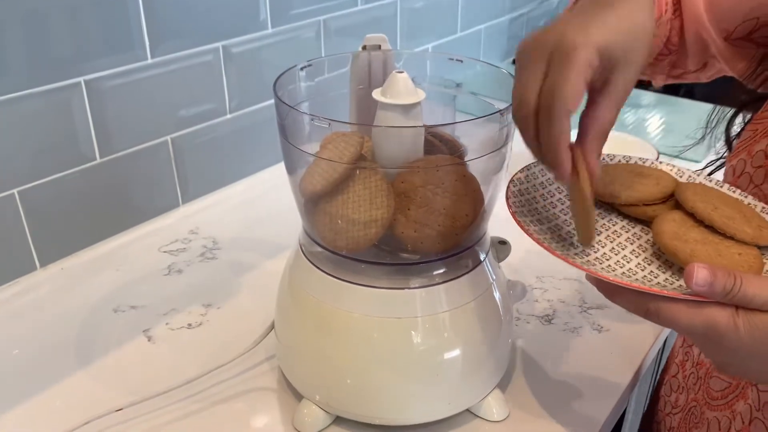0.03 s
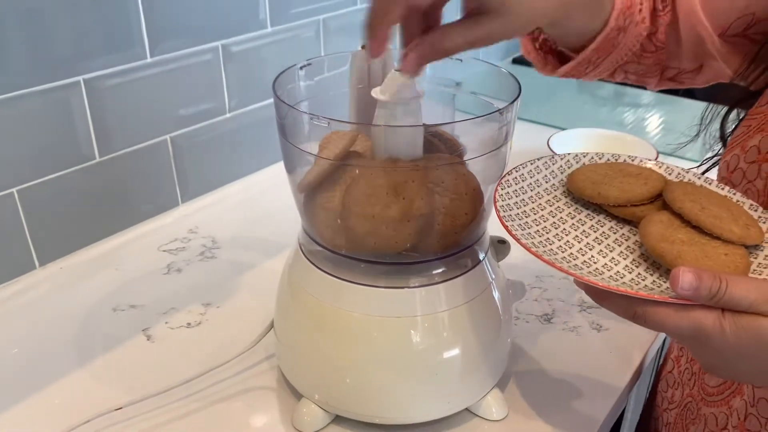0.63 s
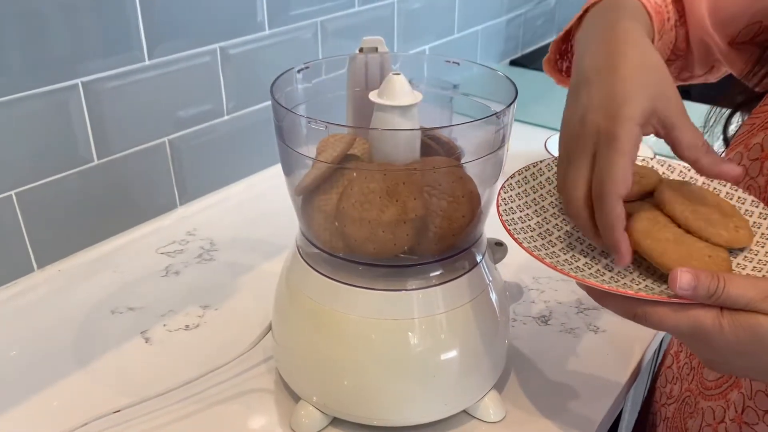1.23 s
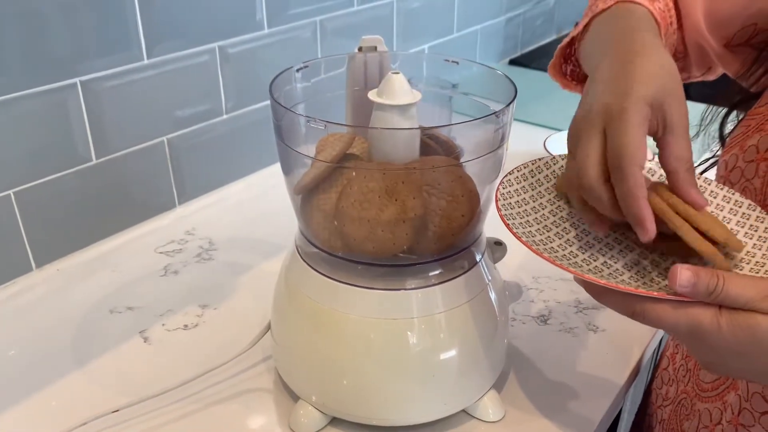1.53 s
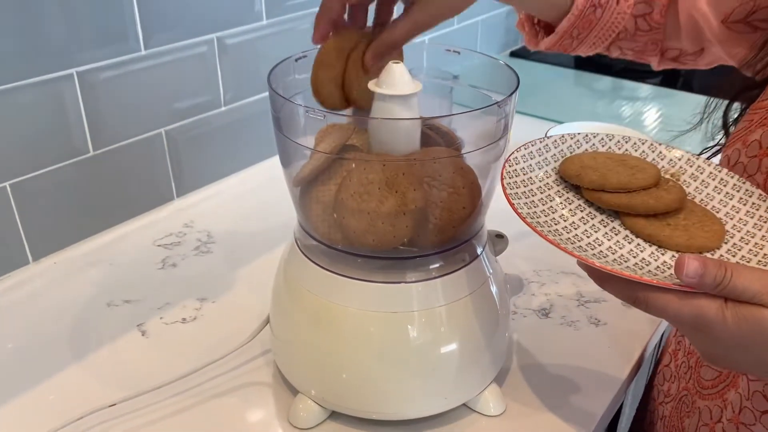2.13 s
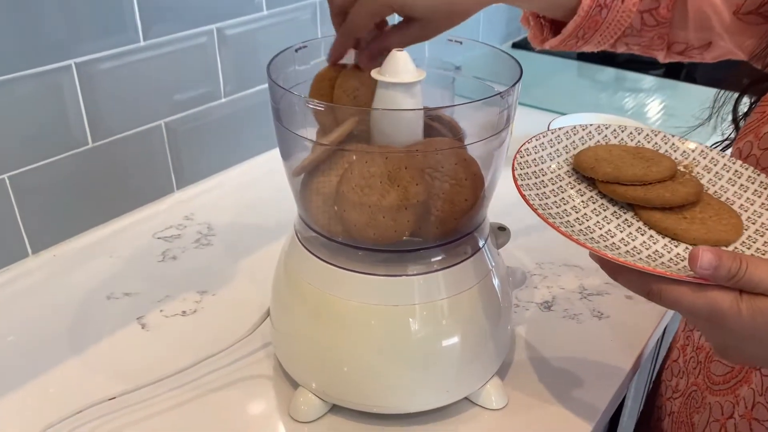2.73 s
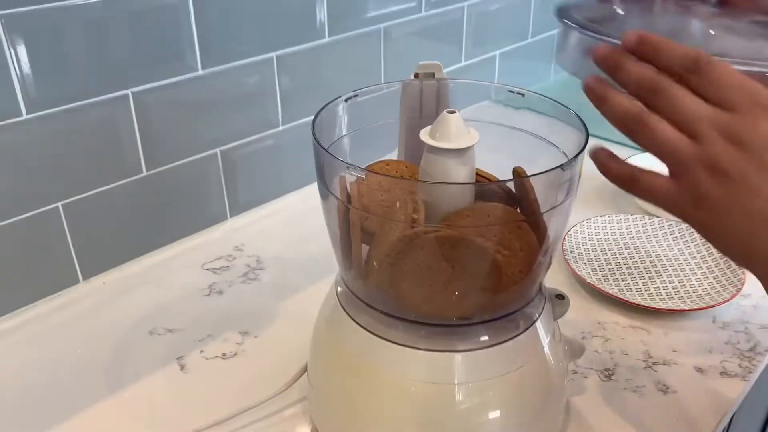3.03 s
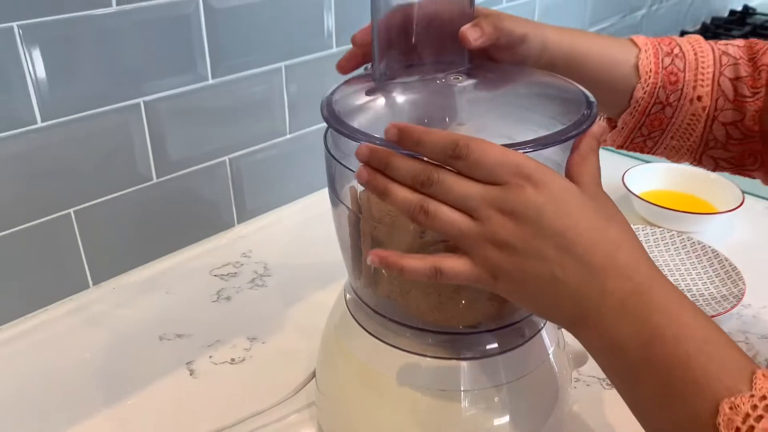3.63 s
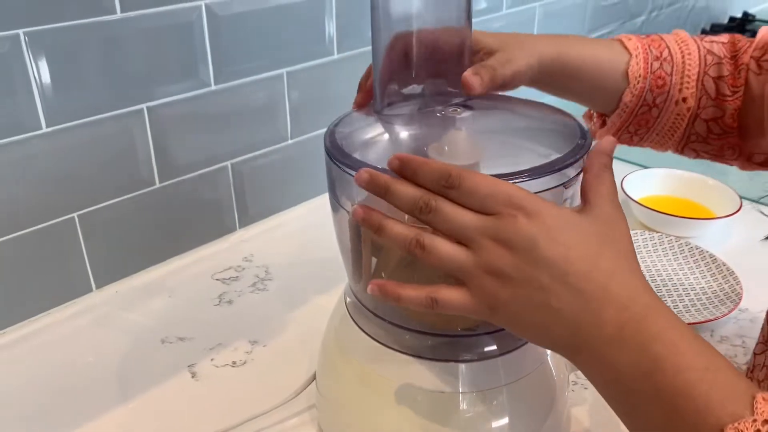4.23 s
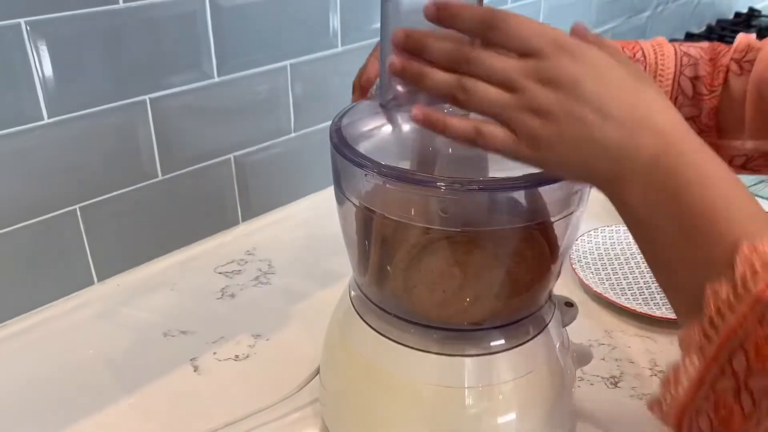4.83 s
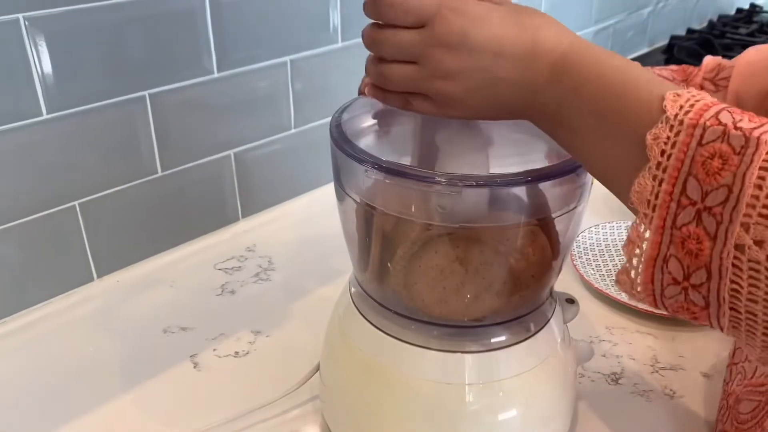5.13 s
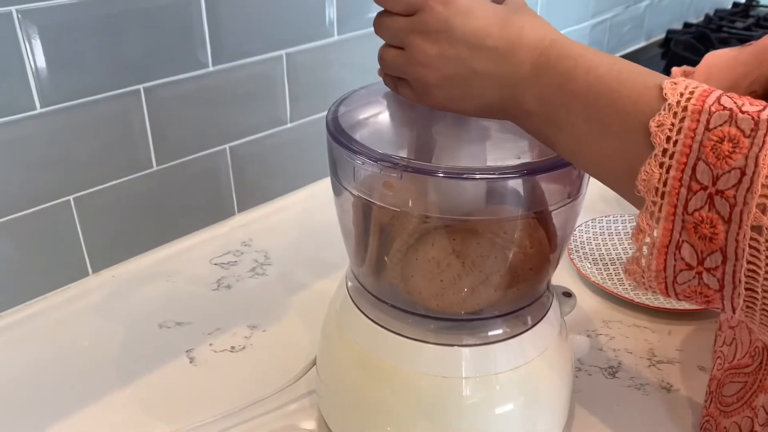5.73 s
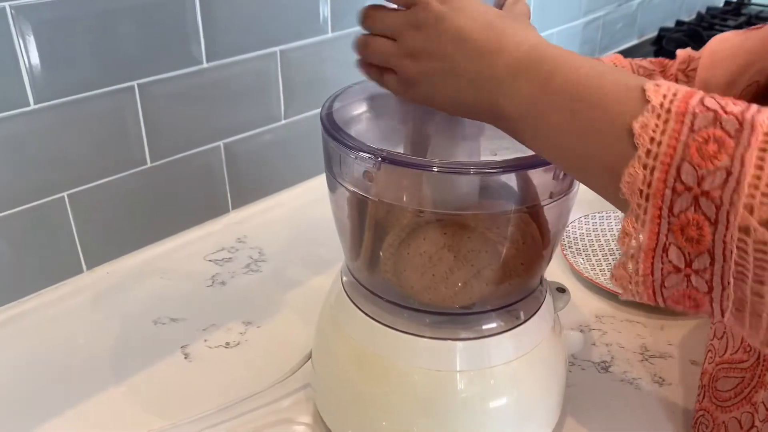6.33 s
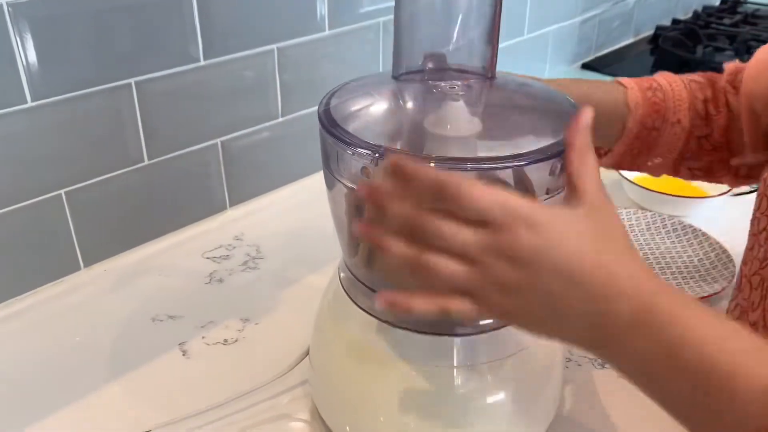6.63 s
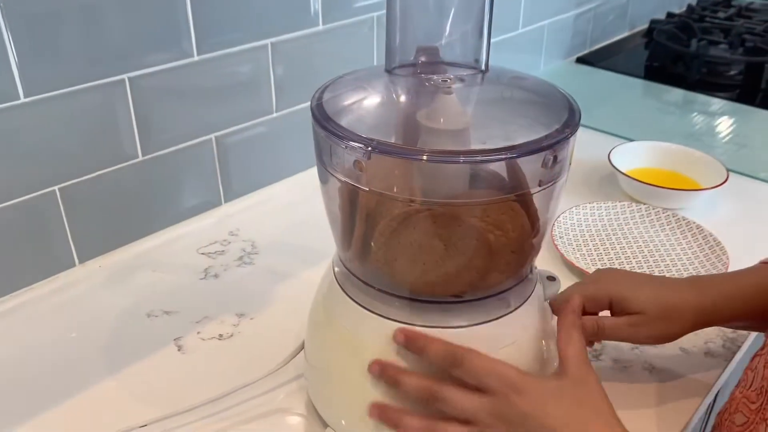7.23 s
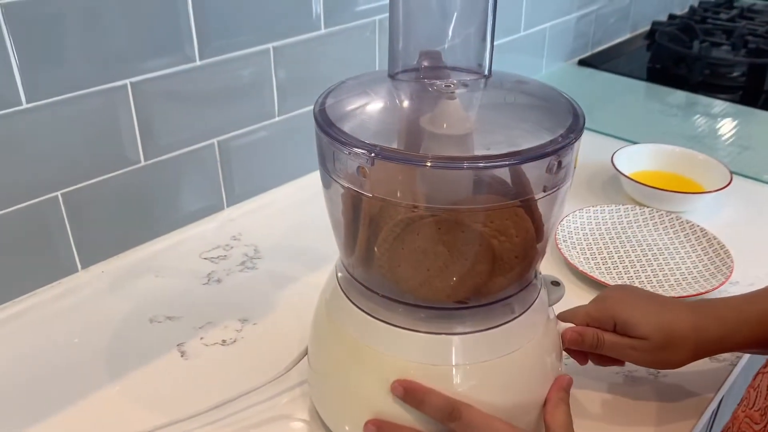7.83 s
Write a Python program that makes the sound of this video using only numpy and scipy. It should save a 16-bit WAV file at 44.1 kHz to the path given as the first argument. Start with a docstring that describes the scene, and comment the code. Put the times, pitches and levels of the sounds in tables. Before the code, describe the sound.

In a tiled kitchen, a biscuit drops into a plastic food processor bowl. More biscuits scrape and clink on a china plate, then settle in the bowl with dry little taps. After an instant of near silence, the plastic lid taps the rim, squeaks briefly and snaps down loudly, then rubs and knocks as it locks. Hands softly bump the machine. The stereo microphone is close, with dull room tone behind.

```python
"""A tiled kitchen, stereo microphone close to a food processor on the worktop, dull room tone behind.
Biscuits scrape on a china plate; one drops into the plastic bowl, more clink off the plate and settle in.
After an instant of near silence the lid rubs and taps on the rim, squeaks, snaps down and is twisted
and knocked until it locks. Last, hands bump the machine, which rumbles on its feet.
Each blow is a short crush of grainy contact that leaves the struck thing ringing into the room."""
import sys
import numpy as np
from scipy import signal
from scipy.fft import rfft, irfft, next_fast_len
from scipy.io import wavfile
from scipy.ndimage import uniform_filter1d

SR = 44100
rng = np.random.default_rng(int(sys.argv[2]) if len(sys.argv) > 2 else 0)


def master_out(mix):
    """Clip the mix to full scale and print it as 16-bit PCM to the path in sys.argv[1]."""
    frames = np.transpose(np.atleast_2d(mix))
    ceiling = np.clip(frames, -1, 1)
    pcm = np.round(ceiling * 32767).astype(np.int16)
    wavfile.write(sys.argv[1], SR, pcm)


N = 356328
TIME = np.arange(N) / SR


def from_db(db):
    return 10 ** (np.asarray(db) / 20)


def rms(x):
    """Level of the middle of a stereo sound."""
    return np.sqrt(np.mean(x.mean(axis=0) ** 2) + 1e-20)


def at_hz(points, hz):
    """Read a table on a log-frequency axis."""
    points = np.array(points)
    return np.interp(np.log(np.maximum(hz, 1)), np.log(points[:, 0]), points[:, 1])


def between(rows, start, end):
    return [row for row in rows if start <= row[0] < end]


def dying(t, t60):
    return np.exp(-np.log(1000) * t / t60)


def band(x, low, high):
    return signal.sosfilt(signal.butter(3, [low, high], "band", fs=SR, output="sos"), x)


def fft_grid(size):
    """A fast transform length and the frequencies of its bins."""
    padded = next_fast_len(size)
    return padded, np.arange(padded // 2 + 1) * SR / padded


def grain(per_s, spread_db, size):
    """The uneven pressure of rough surfaces catching and slipping; rms 1."""
    knots = np.clip(rng.standard_normal(size // 8), -2, 2)
    gain = from_db(spread_db * np.interp(np.arange(size) * per_s / SR, np.arange(len(knots)), knots))
    return gain / np.sqrt(np.mean(gain ** 2))


def stroke(start, length, swell_share, release_t60):
    """A movement gathers speed over a share of its length, holds and dies away."""
    out, first = np.zeros(N), int(start * SR)
    t = TIME[:min(N - first, int((length + release_t60) * SR))]
    swell = 1 - np.exp(-(t / (swell_share * length)) ** 2)
    out[first:first + len(t)] = swell * dying(np.maximum(t - length, 0), release_t60)
    return out


def resonant(x, modes, peak_db, width_hz):
    """A rubbed body favours its own modes, broadened by the touch; rms 1."""
    padded, hz = fft_grid(N)
    peaks = sum(1 / (1 + 2j * (hz - row[0]) / width_hz) for row in modes)
    out = irfft(rfft(x, padded) * (1 + from_db(peak_db) * peaks), padded)[:, :N]
    return out / rms(out)


# Stereo width at the microphone: f/Hz, side over mid/dB
WIDTH = [(60, -30.5), (200, -28), (450, -8.5), (900, -5.5), (1400, -2), (2000, -1.5), (4000, -1),
         (12000, 0)]
def noise(spectrum, size):
    """Coloured stereo noise, centred in the bass and wide in the treble; rms 1."""
    padded, hz = fft_grid(size)
    colour = from_db(at_hz(spectrum, hz)) / (1 + (hz / spectrum[-1][0] / 2) ** 2)
    mid, side = rfft(rng.standard_normal((2, padded))) * colour
    side = side * from_db(at_hz(WIDTH, hz))
    out = irfft(np.array([mid + side, mid - side]), padded)[:, :size]
    return out / rms(out)


def mode(t, hz, t60):
    """One dying sine; its phase leads in the left channel, the more so the higher it is."""
    apart = np.arctan(from_db(at_hz(WIDTH, hz))) * np.array([[1], [-1]])
    phase = 2 * np.pi * (hz * t + rng.random())
    return np.sqrt(2) * np.sin(phase + apart) / np.cos(apart) * dying(t, t60)


# Edges of a blow's five registers (thud, knock, clack, crack, fizz): f/Hz
REGISTERS = [40, 230, 700, 2400, 6000, 15500]
# Decay of the dense ring of many modes, before damping divides it: f/Hz, t60/s
RING_T60 = [(100, 0.27), (400, 0.089), (1300, 0.14), (3800, 0.19), (10000, 0.048)]
def blows(rows, modes, colour, grain_db, damping, snap_db, swell_cycles, rise_share, thud_db, crack_db,
          own_db=-40, ring_db=0, detune=0.004):
    """Surfaces grind for the contact time, then the body rings out; low registers swell later."""
    size, attack = int(0.35 * SR), int(0.03 * SR)
    t, out = np.arange(size) / SR, np.zeros((2, N + size))
    for s, clack_db, bass_db, treble_db, contact in rows:  # bass and treble are relative to the clack
        balance_db = np.array([bass_db + thud_db, bass_db, 0, 0.75 * treble_db + crack_db, treble_db])
        rise = rise_share * contact  # a long contact also starts softly
        hardness = (0.002 / max(rise, 0.0004)) ** 0.78  # a sudden blow wakes the modes more
        start = int(s * SR)
        crush = noise(colour, size) * grain(900, grain_db, size)
        # each point of contact adds a few short rings of its own
        own = [(hz, own_db, 0.07) for hz in np.exp(rng.uniform(np.log(2500), np.log(5500), size=3))]
        for low, high, level_db in zip(REGISTERS, REGISTERS[1:], clack_db + balance_db):
            centre = np.sqrt(low * high)
            held = dying(np.maximum(t - contact, 0), at_hz(RING_T60, centre) / damping)
            first_touch = 1 + from_db(snap_db) * centre / 10000 * dying(t, 0.0033)
            part = band(crush * first_touch * held, low, high)
            part = part / rms(part[:, :attack])
            for hz, mode_db, t60 in list(modes) + own:
                if low <= hz < high:
                    strength = hardness * from_db(ring_db + mode_db + rng.normal(3.8, 2.3))
                    gripped_hz = hz * (1 + detune * rng.normal())  # the grip shifts each mode
                    part = part + strength * mode(t, gripped_hz, t60)
            swell_s = rise / (1 + centre / 9000) + swell_cycles / centre
            part = part * (1 - np.exp(-t / swell_s))
            out[:, start:start + size] += from_db(level_db) * part / rms(part[:, :attack])
    return out[:, :N]


# Spectrum of the empty kitchen: f/Hz, relative level/dB
ROOM_TONE = [(20, -1.5), (55, 2.5), (120, -10.5), (350, -18), (1200, -23), (3000, -43.5), (5500, -38),
             (8000, -36.5), (10200, -33), (12000, -39), (13500, -36.5), (16000, -49.5)]
# A thin tone in the centre: f/Hz, level/dB, start t/s
WHINE = (8020, -96, 2.9)
def background():
    """Dull room tone all round the microphone, joined later by a faint whine."""
    hz, level_db, start = WHINE
    whine = from_db(level_db) * np.sqrt(2) * np.sin(2 * np.pi * hz * TIME) * (TIME > start)
    return from_db(-69.5) * noise(ROOM_TONE, N) + whine


def shaking(struck, t60=0.23):
    """How strongly the machine still shakes from the low part of the blows."""
    keep = dying(2 / SR, t60)
    power = band(struck.mean(axis=0), REGISTERS[0], REGISTERS[2]) ** 2
    return np.sqrt(signal.lfilter([1 - keep], [1, -keep], power + 1e-18))


# Hands on the machine, most while forcing the lid round: t/s, relative rumble/dB, relative rustle/dB
HANDLING = [(0.0, -67.5, -69), (1.2, -67, -87), (1.57, -65, -57.5), (2.05, -77, -85), (2.35, -68, -51),
            (2.8, -80, -70), (3.1, -62, -55.5), (3.35, -70, -64.5), (3.6, -61, -57), (4.27, -62, -47),
            (4.5, -62.5, -44.5), (4.85, -56, -56), (5.6, -52, -52.5), (6.03, -42.5, -46.5),
            (6.42, -62, -59.5), (6.66, -50.5, -61), (7.14, -65.5, -55.5), (7.45, -68, -63.5),
            (7.8, -61.5, -60.5), (8.08, -57.5, -63)]
# Spectra of the rumbling base and the rustling shell: f/Hz, relative level/dB
RUMBLE = [(18, -20.5), (40, -8), (65, 4.5), (110, -12.5), (190, -7), (320, -28.5)]
RUSTLE = [(120, -15.5), (220, -5.5), (330, 0.5), (600, -3.5), (1100, -17.5)]
# Resonances of the air in the bowl: f/Hz
BOWL_AIR = [(283,), (336,), (412,), (625,)]
# Palms and sleeves brushing the machine: t/s, relative clack/dB, bass/dB, treble/dB, contact/s
HAND_BUMPS = [(6.5, -56.5, 3, -18, 0.045), (6.7, -59.5, 7, -16, 0.12), (7.1, -65, 10, -14.5, 0.034),
              (7.228, -57.5, 2, -33, 0.043), (7.565, -55, 4, -32.5, 0.03), (7.76, -61.5, 8.5, -27, 0.084),
              (8.02, -59.5, 4, -22, 0.054)]
def handling(struck):
    """Hands and blows stir the machine, which rumbles on its feet and rustles hollowly."""
    s, rumble_db, rustle_db = np.transpose(HANDLING)
    shake = shaking(struck)
    rumble_gain = np.hypot(from_db(np.interp(TIME, s, rumble_db)), from_db(-14.5) * shake)
    rustle_gain = np.hypot(from_db(np.interp(TIME, s, rustle_db)), from_db(-8.5) * shake)
    rumble = rumble_gain * noise(RUMBLE, N) * grain(27, 4.5, N)
    bumps = blows(HAND_BUMPS, [], ROOM_TONE, grain_db=1, damping=0.2, snap_db=-11, swell_cycles=0.83,
                  rise_share=0.024, thud_db=-8, crack_db=-29)
    hollow = resonant(noise(RUSTLE, N), BOWL_AIR, peak_db=1.5, width_hz=20)
    rustle = rustle_gain * hollow * grain(22, 3, N)
    return from_db(1) * rumble + from_db(-3) * rustle + from_db(-8) * bumps


# Spectrum of fine friction hiss, heard close: f/Hz, relative level/dB
HISS = [(2500, -7.5), (4500, -3), (7000, 0.5), (8700, -1), (10400, 5.5), (12100, -7.5), (13500, 1.5),
        (16000, -16)]
def friction(rows, body, rasp_db, hiss_db, grain_db, stick_db, swell_share, rasp_t60, hiss_t60):
    """Sliding surfaces stick and catch on tiny bumps: a rasp in the body and a fine hiss above it."""
    rasp = sum(from_db(db) * stroke(s, length, swell_share, rasp_t60) for s, length, db, _ in rows)
    hiss = sum(from_db(db) * stroke(s, length, swell_share, hiss_t60) for s, length, _, db in rows)
    catches = grain(390, grain_db, N) * grain(45, stick_db, N)
    return catches * (from_db(rasp_db) * rasp * body + from_db(hiss_db) * hiss * noise(HISS, N))


# Modes of the china plate and the open plastic bowl: f/Hz, relative level/dB, t60/s
PLATE_MODES = [(530, -9, 0.2), (1020, -12, 0.076), (1243, -7, 0.2), (1310, -5, 0.2), (1390, -12, 0.2),
               (1785, -9, 0.13), (2020, -6, 0.28), (2070, 2, 0.04), (2315, -5, 0.042), (2700, -8, 0.12),
               (3350, -6, 0.28), (5260, -16, 0.22), (5416, -15, 0.25)]
BOWL_MODES = [(80.5, -1.5, 0.4), (308.5, -4, 0.34), (367, -4, 0.13), (522, 1, 0.19), (820, 15, 0.019),
              (1036, 15.5, 0.022), (1114, -7.5, 0.11), (1258, -0.5, 0.14), (1630, -3.5, 0.012),
              (1930, -5.5, 0.11), (2105, -9.5, 0.22), (2810, -2, 0.13), (3130, -4, 0.12), (3235, -1, 0.11),
              (4022, 6.5, 0.045), (3950, -8.5, 0.14), (4970, -16, 0.18), (5320, -12, 0.076)]
# Spectra of biscuit scraping china and plastic: f/Hz, relative level/dB
DRY_RASP = [(400, -26), (750, -5.5), (1200, -5), (2000, -8), (3300, -4.5), (5000, -13), (8000, -38)]
BOWL_SCRAPE = [(300, 1), (750, 3.5), (1200, -1.5), (2000, -7), (3300, -7), (5000, -19), (8000, -24)]
# Slides on the plate and in the bowl: t/s, length/s, relative rasp/dB, relative hiss/dB
PLATE_SLIDES = [(0.0, 0.027, -63, -74), (0.24, 0.12, -79, -86), (0.952, 0.15, -62, -80),
                (1.352, 0.2, -46, -63.5)]
BOWL_SLIDES = [(0.503, 0.18, -45.5, -65), (2.129, 0.1, -54, -71), (2.225, 0.385, -45.5, -67.5),
               (2.662, 0.033, -39, -71)]
def sliding():
    """Biscuits scrape over the china plate and the hollow bowl, and sound their modes."""
    bowl = resonant(noise(BOWL_SCRAPE, N), BOWL_MODES, peak_db=7.5, width_hz=27)
    plate = resonant(noise(DRY_RASP, N), PLATE_MODES, peak_db=5.5, width_hz=70)
    in_bowl = friction(BOWL_SLIDES, bowl, rasp_db=-9.5, hiss_db=1, grain_db=2, stick_db=3.5,
                       swell_share=0.14, rasp_t60=0.12, hiss_t60=0.21)
    on_plate = friction(PLATE_SLIDES, plate, rasp_db=-9.5, hiss_db=5, grain_db=0.5, stick_db=3.5,
                        swell_share=0.089, rasp_t60=0.5, hiss_t60=0.37)
    return on_plate + in_bowl


def crumbs(per_s=60):
    """Crumbs break off at random while a biscuit slides, each with a small dry tick."""
    pressure = sum(from_db(rasp_db) * stroke(s, length, swell_share=0.16, release_t60=0.13)
                   for s, length, rasp_db, _ in BOWL_SLIDES + PLATE_SLIDES)
    breaks = (rng.random(N) < per_s / SR) * rng.standard_normal(N) * pressure
    t = np.arange(SR // 20) / SR
    tick = noise(DRY_RASP, len(t)) * dying(t, t60=0.02)
    return from_db(-13) * signal.fftconvolve(breaks[None], tick, axes=1)[:, :N]


# Spectrum of the dense ring of a biscuit's blow: f/Hz, relative level/dB
BISCUIT_COLOUR = [(40, 2), (80, 5.5), (140, -34), (320, 22), (680, -1), (1050, 3.5), (1500, -3.5),
                  (2000, 1.5), (2500, -2.5), (3700, -4), (6000, -16.5), (10500, -8.5), (15000, -18)]
# Biscuits hitting the bowl and the plate: t/s, clack/dB, bass/dB, treble/dB, contact/s
BOWL_DROPS = [(0.601, -34.5, 1, -8.5, 0.0097), (2.156, -55, 1, -12, 0.0071), (2.167, -53, 0, -5, 0.0052),
              (2.246, -48.5, 4.5, -10, 0.0066), (2.277, -50, -10, -12.5, 0.0034),
              (2.312, -50.5, 1, -22, 0.0046), (2.357, -36, -5.5, -28.5, 0.0017),
              (2.396, -46, -8, -18.5, 0.0071), (2.491, -48.5, 2, -23, 0.0036),
              (2.529, -54.5, -5, -15, 0.01), (2.573, -52, 4.5, -11.5, 0.0058),
              (2.593, -64, 11.5, -14, 0.0076), (2.641, -54.5, 3, -7, 0.02),
              (2.664, -45, -11.5, -10.5, 0.0095), (2.695, -57, 0, -12, 0.012),
              (2.764, -55.5, -5.5, -14.5, 0.0041)]
PLATE_CLINKS = [(0.977, -51.5, -5, -20.5, 0.0068), (1.06, -45, -10.5, -24.5, 0.025),
                (1.107, -51.5, -8.5, -21, 0.03), (1.402, -58, -8, -4, 0.012),
                (1.4525, -43, -11, -15.5, 0.0044), (1.536, -83, -13, -7, 0.002),
                (1.5562, -39, -10, -17, 0.0057), (1.625, -56, -0.5, -9.5, 0.0064),
                (1.745, -58, 6, -25, 0.018), (1.834, -77, 8, -2, 0.014)]
def biscuits(settling_from_s=2.0):
    """One crumbly landing in the bowl, dry clinks on the plate, softer settling under the fingers."""
    landing = blows(between(BOWL_DROPS, 0, settling_from_s), BOWL_MODES, BISCUIT_COLOUR,
                    grain_db=3.5, damping=2.1, snap_db=16, swell_cycles=1, rise_share=0.67,
                    thud_db=-13, crack_db=3.5, own_db=-15)
    settling = blows(between(BOWL_DROPS, settling_from_s, np.inf), BOWL_MODES, BISCUIT_COLOUR,
                     grain_db=5, damping=1.97, snap_db=12, swell_cycles=0.45, rise_share=0.56,
                     thud_db=-4, crack_db=3.5, own_db=-16, ring_db=-2.5, detune=0.0348)
    clinks = blows(PLATE_CLINKS, PLATE_MODES, BISCUIT_COLOUR,
                   grain_db=1, damping=1.74, snap_db=20.5, swell_cycles=0.22, rise_share=0.16,
                   thud_db=-3, crack_db=5, own_db=-23, ring_db=-9.5)
    return landing + clinks + settling


# The machine rocking on its feet after the hardest landings and shoves: t/s, f/Hz, level/dB, t60/s
THUMPS = [(.615, 75, -47, .3), (2.298, 91.6, -54, .3), (4.345, 199, -21.5, .13), (4.348, 145, -25, .08),
          (4.35, 77, -35, .15), (5.257, 165, -37, .14), (5.823, 160, -34, .11), (5.94, 165, -26.5, .2),
          (5.946, 77, -28, .16), (5.947, 106, -25, .14), (6.505, 102, -45, .35), (6.68, 71, -49, .3),
          (6.79, 96, -49, .2)]
def thumps():
    """The heavy base swings on the worktop, building up over the first cycle."""
    t, out = np.arange(SR // 2) / SR, np.zeros(N)
    for s, hz, level_db, t60 in THUMPS:
        start = int(s * SR)
        swing = np.sqrt(2) * np.sin(2 * np.pi * hz * t) * (1 - np.exp(-t * hz))
        out[start:start + len(t)] += from_db(level_db) * swing * dying(t, t60)
    return out


# Modes of the bowl with its lid down: f/Hz, relative level/dB, t60/s
CLOSED_BOWL_MODES = [(77, -14, 0.2), (163, 4, 0.074), (199, 0, 0.082), (294, -4, .11), (362, -5, 0.099),
                     (562, -8, 0.091), (771, -6, 0.09), (815, -5.5, 0.078), (899, -5, 0.07),
                     (1095, -5, 0.07), (1228, 0, 0.07), (1368, 2, 0.07), (1514, -3, .05), (1656, 5, 0.09),
                     (1703, -4, 0.07), (1897, -7, 0.06), (2442, -10, 0.08), (2627, -12, 0.06),
                     (3068, -5, .06), (3170, -6, .05), (3268, -8, .06), (3582, -8, 0.08)]
# Spectrum of rubbed plastic: f/Hz, relative level/dB
RUB_COLOUR = [(400, -22.5), (750, -5), (1250, 2), (2000, -3.5), (3300, -11), (5000, -22), (8000, -41)]
# Strokes of lid and hands: t/s, length/s, relative rasp/dB, relative hiss/dB
RUBS = [(2.88, 0.13, -57, -78.5), (3.5, 0.25, -58, -62), (4.295, 0.019, -37.5, -52.5),
        (4.41, 0.077, -33.5, -76), (4.92, 0.064, -46.5, -64), (5.115, 0.081, -35.5, -49),
        (5.635, 0.038, -38, -52), (5.97, 0.016, -37.5, -67.5), (6.24, 0.066, -53, -60.5),
        (6.42, 0.085, -61.5, -68), (6.87, 0.085, -62, -68), (7.09, 0.04, -72, -88)]
def rubbing():
    """The lid turns on the rim and hands drag over the plastic, faintly sounding the bowl."""
    rim = resonant(noise(RUB_COLOUR, N), CLOSED_BOWL_MODES, peak_db=-6, width_hz=30)
    return friction(RUBS, rim, rasp_db=-7, hiss_db=1, grain_db=0, stick_db=2,
                    swell_share=0.87, rasp_t60=0.69, hiss_t60=0.8)


# Spectrum of the dense ring of struck plastic: f/Hz, relative level/dB
PLASTIC_COLOUR = [(40, -18), (90, -2.5), (200, -1.5), (450, -5), (680, -10.5), (1000, 1.5), (1550, -7),
                  (2300, -7.5), (3200, -10), (5000, -23), (8000, -17), (10300, -15), (12200, -21),
                  (13500, -22), (15500, -29.5)]
# Modes of the lid in the hand: f/Hz, relative level/dB, t60/s
LOOSE_LID_MODES = [(358, 16, 0.135), (645, -1, 0.08), (762, 1, 0.042), (846, 4.5, 0.035), (968, -2, 0.06),
                   (1227, 3, 0.07), (1373, 0, 0.06), (2001, 1, .03), (3330, -7, 0.03), (4000, -5, .04)]
# First touches on the rim: t/s, clack/dB, bass/dB, treble/dB, contact/s
LID_TAPS = [(3.411, -38.5, 9, -6.5, 0.015), (3.481, -30.5, 3, -32.5, 0.0035),
            (3.567, -48, -11.5, -6.5, 0.015)]
def loose_lid():
    """Held just above the bowl, the lid taps the rim with a short hollow note."""
    return blows(LID_TAPS, LOOSE_LID_MODES, PLASTIC_COLOUR, grain_db=1.5, damping=1.3, snap_db=6,
                 swell_cycles=1.8, rise_share=0.13, thud_db=-14, crack_db=2.5, ring_db=-1)


# Modes of the lid lying tilted on the rim: f/Hz, relative level/dB, t60/s
TILTED_LID_MODES = [(279, 6.5, 0.059), (340, 10, 0.041), (570, -2, 0.16), (775, -6.5, 0.11),
                    (860, -4, 0.057), (1273, -2, 0.14), (1340, -0.5, 0.12), (1633, 3, 0.092),
                    (1900, -2, 0.11), (2140, -15, 0.54), (2830, -12, 0.15), (2870, -12.5, 0.17),
                    (3526, -10.5, 0.16)]
# The lid seating and locking: t/s, clack/dB, bass/dB, treble/dB, contact/s
LID_KNOCKS = [(3.838, -70.5, 21, 5, 0.033), (3.922, -54.5, 13, -9, 0.017), (3.960, -30.5, -2, -15, 0.0045),
              (3.976, -33, -3.5, -31, 0.011), (4.007, -36.5, 6, -24, 0.0096),
              (4.022, -39.5, 0.5, -25, 0.0066), (4.077, -52.5, 3.5, -24, 0.053),
              (4.125, -67, 3.5, -50, 0.0049), (4.213, -56.5, 11, -23, 0.0027),
              (4.3378, -16.5, -12.5, -13.5, 0.0031), (4.3465, -23, -11.5, -20, 0.002),
              (4.3565, -21.5, -11, -17, 0.0057), (4.577, -47, -1, -13.5, 0.0041),
              (4.967, -42.5, 0, -14.5, 0.005), (5.062, -50.5, 1.5, -27, 0.0017),
              (5.248, -25.5, -5, -18.5, 0.0023), (5.425, -58.5, -5.5, -8, 0.018),
              (5.557, -60.5, -20, -7, 0.056), (5.69, -37.5, -3.5, -2, 0.0074),
              (5.739, -44.5, 1, -16, 0.008), (5.815, -32.5, 0, -14, 0.0096), (5.930, -30, -4, -9.5, 0.0056),
              (6.154, -54.5, -6, -36, 0.0079), (6.303, -62, 8, -26, 0.004),
              (6.3185, -45, -16, -11.5, 0.0022), (7.125, -76, -9, -8, 0.0054)]
def closing_lid(snap_from_s=4.3, grip_from_s=4.5):
    """The lid rings with the bowl, snaps home, and is then muffled by the twisting hand."""
    seating = blows(between(LID_KNOCKS, 0, snap_from_s), TILTED_LID_MODES, PLASTIC_COLOUR,
                    grain_db=-1.5, damping=1.2, snap_db=13, swell_cycles=2.5, rise_share=0.091,
                    thud_db=-18.5, crack_db=5, own_db=-22, ring_db=-9, detune=0.02)
    snap = blows(between(LID_KNOCKS, snap_from_s, grip_from_s), CLOSED_BOWL_MODES, PLASTIC_COLOUR,
                 grain_db=3, damping=1.5, snap_db=12.5, swell_cycles=1.8, rise_share=0.1,
                 thud_db=-7.5, crack_db=5, own_db=-22, ring_db=-10)
    locking = blows(between(LID_KNOCKS, grip_from_s, np.inf), CLOSED_BOWL_MODES, PLASTIC_COLOUR,
                    grain_db=2.5, damping=1.71, snap_db=8, swell_cycles=3.5, rise_share=0.254,
                    thud_db=-3.5, crack_db=5, own_db=-18, ring_db=-9.5, detune=0.04)
    return seating + snap + locking


# The rim squeaking over the catch: t/s, length/s, f/Hz, level/dB
SQUEAKS = [(3.947, 0.018, 1720, -36.5), (4.316, 0.019, 1196, -28)]
# Partials of a squeak: frequency ratio, relative level/dB
SQUEAK_PARTIALS = [(0.998, 2), (1.3, -14.5), (1.87, -18.5), (2.6, -16)]
def squeaks(waver_share=0.014):
    """Plastic sticks and slips on plastic at a wavering pitch, swelling until the catch gives."""
    out = np.zeros(N)
    for s, length, hz, level_db in SQUEAKS:
        waver = uniform_filter1d(rng.standard_normal(N), size=100)
        turns = np.cumsum(hz * (1 + waver_share * waver / waver.std())) / SR
        tone = sum(from_db(db) * np.sin(2 * np.pi * ratio * turns) for ratio, db in SQUEAK_PARTIALS)
        push = stroke(s, length, swell_share=0.71, release_t60=0.048)
        out += from_db(level_db) * np.sqrt(2) * tone * push
    return out * grain(450, 1.5, N)


# First echoes off worktop and tiles: left delay/s, right delay/s, treble level/dB
ECHOES = [(.0013, 0.0012, -20.5), (.0041, 0.0025, -12), (.0066, .0074, -15)]
# Balance at the microphone: f/Hz, lift of the left and fall of the right/dB
LEFT_LIFT = [(150, -1), (350, -1.3), (600, 0), (900, 1.2), (1100, -0.5), (1400, 2), (1650, -1.8),
             (1900, 2.1), (2500, -0.6), (3500, 1.5), (6000, -0.95), (12000, 0)]
def nearby_surfaces(x, echo_from_hz=6000):
    """Hard surfaces near the microphone ripple the treble with echoes and tip bands left or right."""
    padded, hz = fft_grid(N + SR)
    mirrored = hz ** 2 / (hz ** 2 + echo_from_hz ** 2)
    paths, power = 1, 1
    for left, right, level_db in ECHOES:
        gain = from_db(level_db) * mirrored
        paths = paths + gain * np.exp(-2j * np.pi * hz * np.array([[left], [right]]))
        power = power + gain ** 2
    lift_db = at_hz(LEFT_LIFT, hz)
    response = paths / np.sqrt(power) * from_db([lift_db, -lift_db])
    return irfft(rfft(x, padded) * response, padded)[:, :N]


# Bands shared by both channels: low f/Hz, high f/Hz, share of the power, lag of the left/s
DIRECT_WAVES = [(1900, 3200, 0.4, -.0002), (8200, 30000, 0.63, .000302)]
def direct_waves(x):
    """In some bands much of the sound reaches the microphone as one wave, sooner on one side."""
    padded, hz = fft_grid(N + SR)
    left, right = rfft(x, padded)
    for low, high, most, lag in DIRECT_WAVES:
        share = most / (1 + (low / (hz + 1)) ** 10 + (hz / high) ** 10)
        left = np.sqrt(1 - share) * left + np.sqrt(share) * right * np.exp(-2j * np.pi * hz * lag)
    return irfft(np.array([left, right]), padded)[:, :N]


# The room's tail, one row a register: nominal f/Hz, t60/s, relative level/dB
KITCHEN_TAIL = [(120, 0.24, 1.5), (450, 0.7, 0.5), (1300, 0.71, -2.5), (3800, 0.55, -3), (10000, 0.13, 1)]
def kitchen(x):
    """Farther off, tiles and worktop scatter the sound into a tail that dies soonest in the treble."""
    t = np.arange(SR) / SR
    scatter, tail = noise([(20, 0), (20000, 0)], SR), 0
    for low, high, (_, t60, level_db) in zip(REGISTERS, REGISTERS[1:], KITCHEN_TAIL):
        fade = dying(t, t60) * (1 - np.exp(-(t / 0.0017) ** 2))
        tail = tail + from_db(level_db) * band(scatter, low, high) * fade / np.sqrt(np.sum(fade ** 2))
    return signal.fftconvolve(x.mean(axis=0)[None], tail, axes=1)[:, :N]


def scene():
    """Biscuits and lid close to the microphone, the kitchen answering their blows from behind."""
    crumbly, taps = biscuits(), loose_lid()
    plastic = closing_lid() + squeaks() + thumps()
    near = crumbly + taps + plastic + rubbing() + sliding() + crumbs()
    room = kitchen(from_db(-9) * crumbly + from_db(-11) * taps + from_db(-9.5) * plastic)
    return direct_waves(nearby_surfaces(near)) + room + handling(crumbly + plastic) + background()


# A moment of near silence: start t/s, end t/s
DROPOUT = (2.806, 2.856)
def record(dry, stopband_hz=16900):
    """The sound drops out briefly, is clipped at full scale and loses its very top."""
    live = uniform_filter1d(1.0 * ((TIME < DROPOUT[0]) | (TIME > DROPOUT[1])), size=200)
    heard = np.clip(dry * np.maximum(live, from_db(-51)), -1, 1)
    return signal.sosfilt(signal.cheby2(14, 70, stopband_hz, fs=SR, output="sos"), heard)


dry = scene()
out = record(dry)
master_out(out)
```